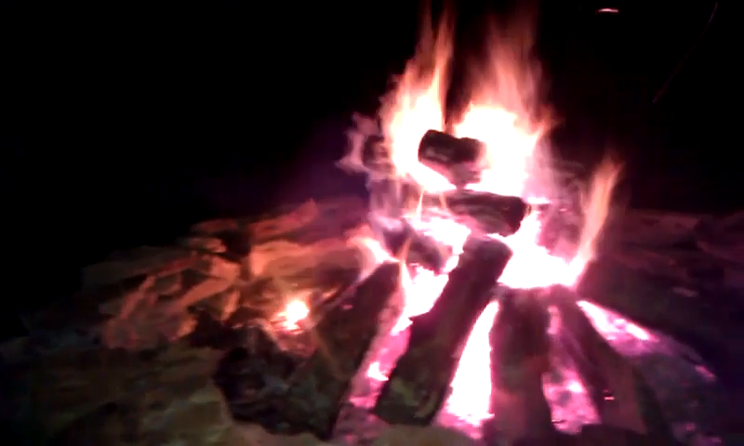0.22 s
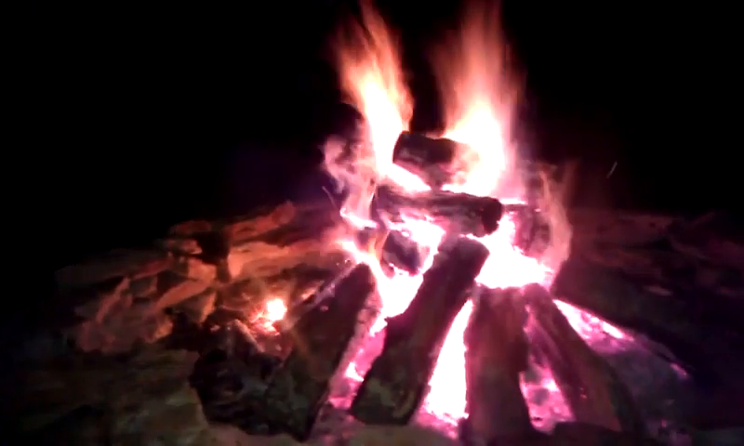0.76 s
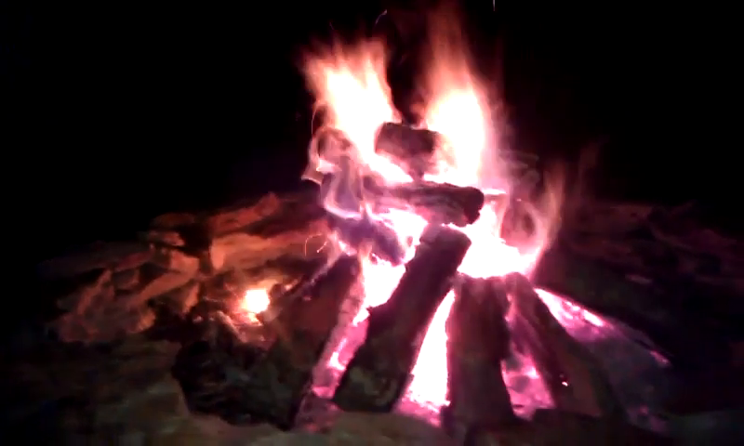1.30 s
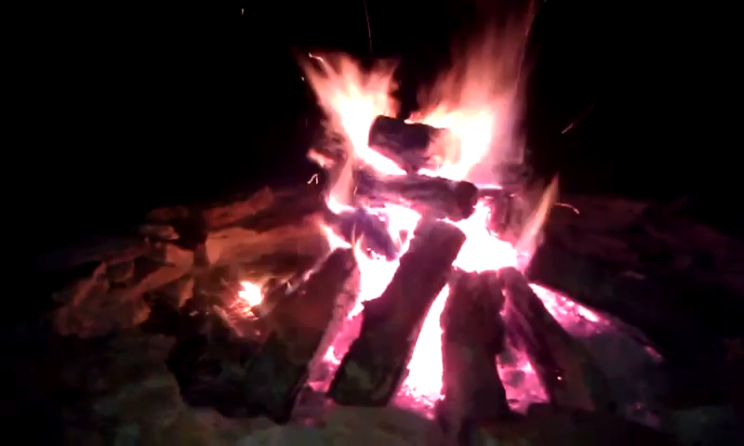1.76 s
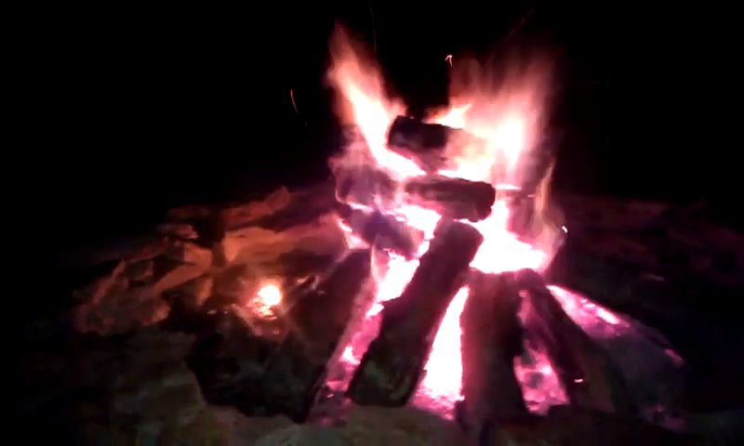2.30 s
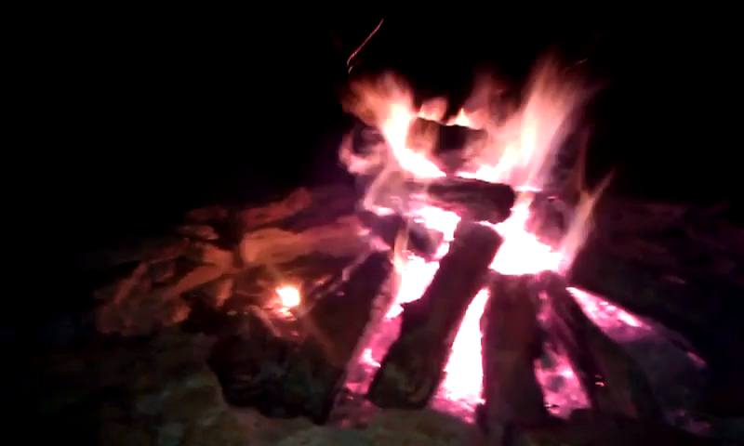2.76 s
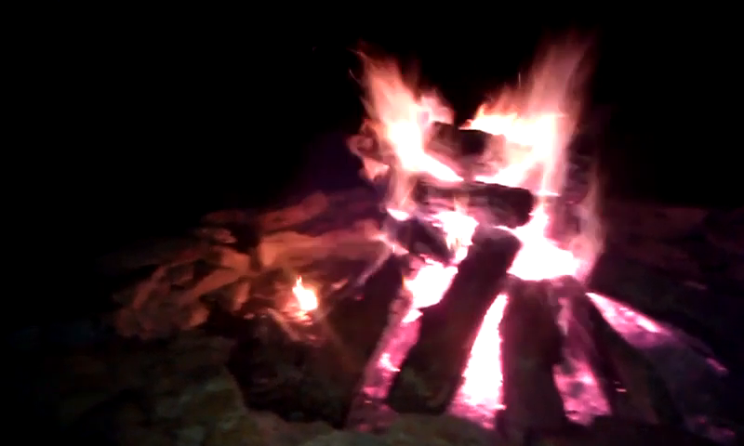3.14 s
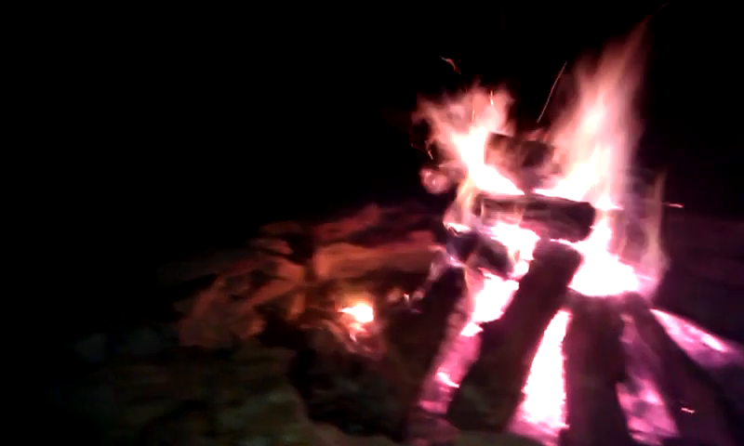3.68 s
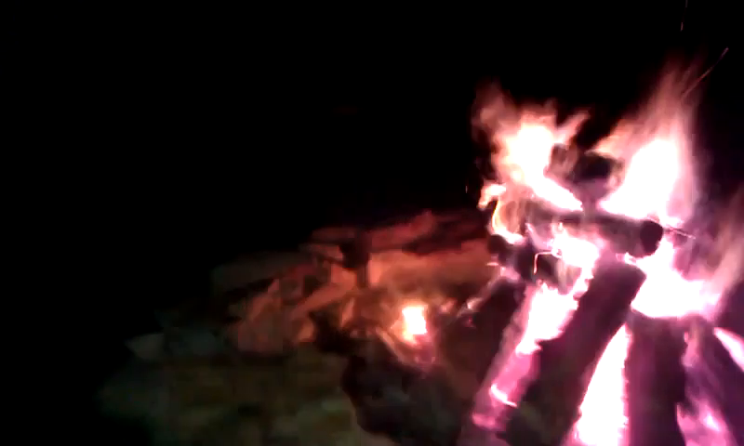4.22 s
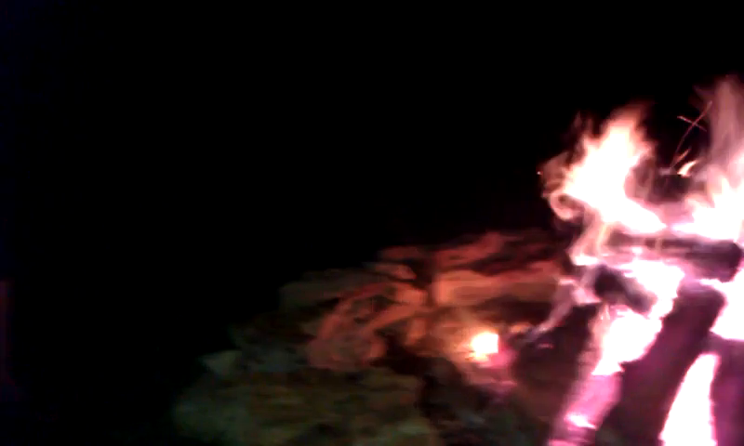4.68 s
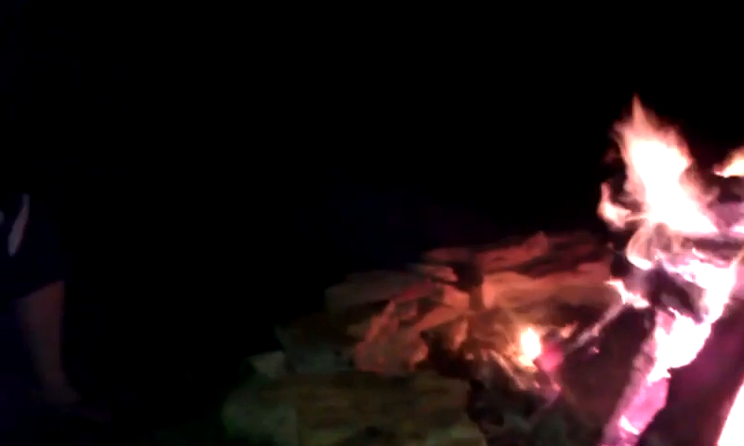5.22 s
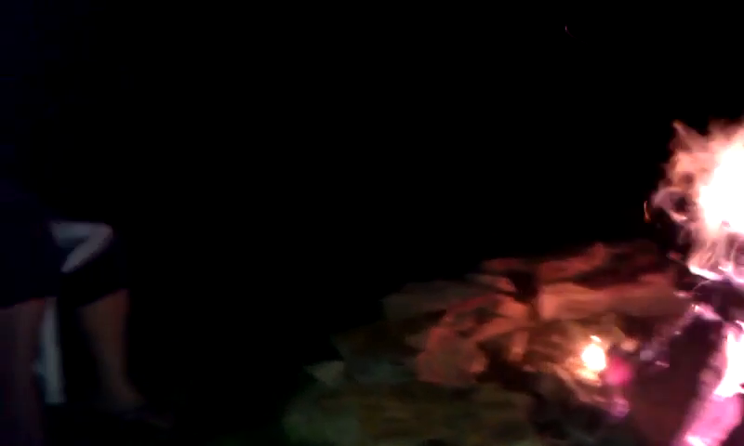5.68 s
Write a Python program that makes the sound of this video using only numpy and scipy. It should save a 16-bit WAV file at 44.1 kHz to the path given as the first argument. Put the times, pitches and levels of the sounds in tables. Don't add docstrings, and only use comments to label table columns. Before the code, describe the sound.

A wood fire burns outdoors at night, a few metres from a small, bright microphone. Soft low flame flutter lies under constant thin sizzling hiss, sprinkled with tiny ticks. Crickets hum far behind at a middle and a higher pitch; one tree cricket pulses rapidly in swelling phrases, and others come and go. High katydid zips scrape at 0.2-0.6 s, lower paired rasps at 1.8-2.2 and 4.5-4.9 s. Sharp snaps with a high ring come irregularly: strong ones near 1.0, 1.6 and 2.0 s, a much louder one at 2.4 s, with dull faint wood knocks around 1.0 and 2.1-2.3 s. Light cracks cluster at 3.0-3.5 s, then a wet rapid sputter with hiss at 3.7 s. The loudest pop strikes at 4.9 s with quick followers. Afterwards sparse crackles continue over hiss and crickets to about 6 s. Faint electric whines and grainy treble persist.

```python
import sys
import numpy as np
from scipy import signal
from scipy.fft import rfft, irfft
from scipy.io import wavfile
from scipy.ndimage import uniform_filter1d, minimum_filter1d

SR = 44100
rng = np.random.default_rng(int(sys.argv[2]) if len(sys.argv) > 2 else 0)


def level_to_linear(level):
    exponent = np.asarray(level, float) / 20
    return 10 ** exponent


def bounce(signal):
    frames = np.transpose(np.atleast_2d(signal))
    limited = np.clip(frames, -1, 1)
    pcm = np.round(limited * 32767).astype(np.int16)
    wavfile.write(sys.argv[1], SR, pcm)


N = 262350

# (frequency [Hz], density [dB per Hz])
AIR_SPECTRUM = [(900, -25.5), (1500, -22.5), (2800, -10.5), (3500, -11.5), (5000, -10.5), (6500, -7),
                (7600, -7), (8800, 0), (9600, -4), (10600, -12.5), (12500, -15.5), (15500, -18.5),
                (17200, -17.5), (19500, -38)]


def evened(x):
    return x / np.sqrt(np.mean(x ** 2) + 1e-20)


def add(mix, s, sound):
    part = mix[max(round(s * SR), 0):][:len(sound)]
    part += sound[:len(part)]


def resonate(x, hz, width):
    return signal.lfilter(*signal.iirpeak(hz, hz / width, SR), x)


def band(x, lo_hz, hi_hz):
    return signal.sosfilt(signal.butter(2, [lo_hz, hi_hz], "bandpass", fs=SR, output="sos"), x)


def wander(per_s):
    knots = rng.standard_normal(400)
    return np.interp(np.arange(N) / SR * per_s, np.arange(400), knots)


def coloured(x, points):
    f, db = np.transpose(points)
    hz = np.fft.rfftfreq(N, 1 / SR)
    gain_db = np.interp(np.log(hz + 1), np.log(f + 1), db, -90, -90)
    return evened(irfft(rfft(x) * level_to_linear(gain_db), N))


def excerpt(layer, s, end, db, soft):
    at = np.arange(round(s * SR), min(round(end * SR), N))
    piece = np.zeros(N)
    piece[at] = level_to_linear(db) * layer[at] * signal.windows.tukey(len(at), soft)
    return piece


def flames():
    # (frequency [Hz], density [dB per Hz])
    flame_spectrum = [(12, -37), (20, -6.5), (53, 0), (97, 1), (165, -2.5), (249, -2.5), (331, -6),
                      (392, -17.5), (430, -14), (464, -14), (639, -10), (931, -18), (1380, -20),
                      (1800, -18), (2340, -4), (3960, -120)]
    level_db = -47 + 0.8 * wander(14)
    return level_to_linear(level_db) * coloured(rng.standard_normal(N), flame_spectrum)


def sizzle():
    # (time [s], level [dB])
    sizzle_level = [(0.0, -47), (0.49, -47), (0.79, -48), (1.28, -46.5), (2.12, -48.5), (3.1, -47.5),
                    (3.35, -46.5), (4.24, -47), (4.77, -46), (5.37, -48), (5.8, -45.5)]
    ticks = level_to_linear(4.0 * np.minimum(rng.exponential(1, N), 4)) * rng.choice([-1, 1], N)
    ticks_per_s = 500 * level_to_linear(4.0 * wander(30))
    ticks *= rng.random(N) < ticks_per_s / SR
    hiss = rng.standard_normal(N) * level_to_linear(1.74 * wander(25))
    s, db = np.transpose(sizzle_level)
    level_db = np.interp(np.arange(N) / SR, s, db) + 2.5
    return level_to_linear(level_db) * coloured(hiss + 0.59 * evened(ticks), AIR_SPECTRUM)


def trill(length, hz, per_s):
    phase = (np.arange(length) / SR * per_s + rng.random()) % 1
    shape = np.sin(np.pi * np.clip(phase / .75, 0, 1))
    pitch = hz * (1 + .02 * (.35 - phase) + .006 * wander(40)[:length])
    direct = evened(shape * np.sin(2 * np.pi * np.cumsum(pitch) / SR))
    undergrowth = rng.standard_normal(3000) * np.exp(-np.arange(3000) / SR / .025)
    echoes = signal.oaconvolve(direct, undergrowth)[:length]
    return evened(direct + level_to_linear(-11) * evened(echoes)) * level_to_linear(1.1 * wander(18)[:length])


def phrasing(t):
    # (peak time [s], level [dB])
    phrases = [
        (0.08, -45),
        (0.74, -46),
        (1.35, -49),
        (2.15, -44.5),
        (2.83, -44.5),
        (3.0, -45.5),
        (3.66, -46),
        (4.08, -44),
        (4.36, -45.5),
        (4.88, -46),
    ]
    rest_db, rise_db_per_s, fall_db_per_s = -58, 107, 57
    s, db = np.transpose(phrases)[:, :, None]
    slopes = db - np.where(t < s, rise_db_per_s * (s - t), fall_db_per_s * (t - s))
    return np.maximum(slopes.max(axis=0), rest_db)


def crickets():
    # (centre [Hz], width [Hz], level [dB])
    chorus_bands = [(2138, 165, -50), (2420, 197, -58), (3941, 240, -53), (4127, 130, -56), (3134, 79, -70),
                    (6750, 33, -69.5)]
    # (start [s], end [s], pitch [Hz], level [dB], pulse rate [per s])
    callers = [(0, .36, 4200, -48.5, 36.6), (.32, .83, 4130, -48, 36.8), (.3, .85, 4340, -61, 36.8),
               (0, .86, 3930, -57, 36.4), (1.08, 1.43, 4370, -55, 38), (1.87, 2.24, 4200, -51, 38.2),
               (2.34, 2.82, 4110, -50, 37), (3.1, 3.3, 4350, -60, 39), (3.5, 3.9, 3930, -55, 37),
               (4.77, 4.82, 4330, -50, 38), (5.62, 5.95, 3950, -49.5, 37.5), (5.7, 5.95, 4140, -56, 37.5)]
    t = np.arange(N) / SR
    out = level_to_linear(phrasing(t) - 5.0) * trill(N, 2368, 33.3)
    for hz, width, db in chorus_bands:
        blur = resonate(resonate(rng.standard_normal(N), hz, 1.3 * width), hz, 1.3 * width)
        out += level_to_linear(db - 1.0 + 1.05 * wander(8)) * evened(blur)
    for s, end, hz, db, per_s in callers:
        length = max(round((end - s) * SR), 99)
        add(out, s, level_to_linear(db) * trill(length, hz, per_s) * signal.windows.tukey(length, .08))
    return out


def whines():
    # (frequency [Hz], level [dB])
    whine_tones = [(435, -68.5), (9801, -59.5), (11397, -58.5)]
    t, out = np.arange(N) / SR, np.zeros(N)
    for hz, db in whine_tones:
        level_db = db + 0.5 + 0.79 * wander(3.7)
        out += level_to_linear(level_db) * np.sin(2 * np.pi * hz * t + 0.24 * wander(14))
    return out


def pockets():
    # (time [s], peak [dB], ring [Hz], body re ring [dB], edge re ring [dB])
    pops = [(0.0443, -24.5, 9100, -13, -8), (0.3766, -22.5, 9000, -13, -21),
            (0.4256, -25.5, 8800, -19, -11), (0.9781, -15, 8100, -8, -5), (1.0374, -23, 9600, -23, -6),
            (1.0828, -21.5, 8800, -5, -12), (1.2894, -23.5, 8650, -20, -22), (1.465, -23.5, 9300, -25, -21),
            (1.5953, -26.5, 9130, -5, -7), (1.6402, -13.5, 9060, -11, -9), (1.7951, -24, 8320, -4, -20),
            (1.8494, -18, 9600, -12.5, -9), (1.9974, -12.5, 9400, -13, -22), (2.091, -19.5, 9600, -20, -7),
            (2.1471, -21, 8910, -15, -24), (2.2637, -22, 8500, -13, -19), (2.3922, -7, 8440, -13, -15),
            (2.9863, -22, 7850, -13, -11), (3.667, -28.5, 8950, -9, 3.5), (4.3844, -20.5, 8700, -19, -19),
            (4.4939, -19, 8640, -25, -12), (4.8744, -2.5, 8150, -9, -16), (4.9128, -16, 8840, -6, -29),
            (4.935, -18, 8800, -6, -7)]
    # (time [s], peak [dB])
    cracks = [(0.0226, -25), (0.1303, -29), (0.2158, -32), (1.0738, -24), (1.6, -26), (1.7552, -28),
              (2.3371, -29), (2.4105, -27), (2.5499, -26), (2.8439, -29), (2.9018, -26), (3.011, -22),
              (3.0266, -23.5), (3.0405, -27), (3.299, -25), (3.413, -25.5), (3.4476, -25), (3.4812, -22),
              (3.5287, -25), (3.8953, -25), (4.1474, -24), (4.2214, -24), (4.4436, -25), (4.5348, -23.5),
              (4.6414, -21), (4.7089, -24), (4.8947, -28), (5.4743, -28.5), (5.5747, -22.5), (5.912, -21)]
    # (time [s], peak [dB])
    sputter = [
        (3.6928, -22),
        (3.7002, -18),
        (3.7119, -23),
        (3.7145, -22),
        (3.7208, -24),
        (3.7236, -18),
        (3.7275, -23),
        (3.7297, -25),
        (3.7402, -20),
        (3.7436, -26),
    ]
    # ring [Hz], body and edge re ring [dB]
    crack_colour, wet_colour = [8710, -13, -14.5], [9000, -15, -23]
    faint_count = 60
    faint_s = rng.uniform(0, N / SR, faint_count)
    faint_db = -33 + 2.5 * rng.standard_normal(faint_count)
    small = np.vstack([cracks, sputter, np.c_[faint_s, faint_db]])
    wet = np.isin(small[:, 0], np.transpose(sputter)[0])[:, None]
    usual = np.where(wet, wet_colour, crack_colour)
    chance = rng.standard_normal((len(small), 3)) * [250, 4, 4]
    return np.vstack([pops, np.hstack([small, usual + chance])])


def snaps():
    # (time [s], peak [dB], pitch [Hz])
    knocks = [
        (1.02, -37.5, 656),
        (2.141, -40, 635),
        (2.306, -30.5, 653),
    ]
    out, t, rows = np.zeros(N), np.arange(1300) / SR, pockets()
    rise_s = .0002
    grit = rng.standard_normal((len(rows), 2, 1300))
    burst = np.sign(grit[:, 0]) * (t / rise_s) * np.exp(-t / rise_s)
    burst += level_to_linear(-16) * np.roll(burst, 78, axis=1)
    burst += level_to_linear(-28) * grit[:, 1] * np.exp(-t / .003) * (t > .0005)
    rings = resonate(burst, 8700, 2600)
    bodies = band(burst, 3300, 6600) + .55 * band(burst, 1900, 3300) + .2 * band(burst, 250, 1500)
    edges = band(burst, 10800, 17500)
    for (s, db, hz, body_db, edge_db), ring, body, edge in zip(rows, rings, bodies, edges):
        parts = resonate(ring, hz, 1000), body, -edge
        levels_db = db, db + body_db + 1.5, db + edge_db + 1.5
        snap = sum(level_to_linear(level) * p / abs(p).max() for p, level in zip(parts, levels_db))
        add(out, s - rise_s, snap)
    t = np.arange(2000) / SR
    for s, db, hz in knocks:
        add(out, s, level_to_linear(db) * np.sin(2 * np.pi * hz * t) * np.exp(-t / 0.0032))
    return out


def katydids():
    # (centre [Hz], width [Hz], level [dB])
    wing_bands = [(3005, 500, -4), (4470, 1200, -4), (5020, 1500, 2)]
    # (start [s], peak [s], end [s], peak level [dB])
    rasp_strokes = [
        (1.796, 1.886, 2.05, -46.5),
        (2.03, 2.122, 2.25, -45),
        (4.5, 4.573, 4.68, -46),
        (4.715, 4.803, 4.89, -44),
    ]
    # (start [s], end [s], level [dB])
    zip_strokes = [
        (0.235, 0.263, -43),
        (0.31, 0.383, -43.5),
        (0.418, 0.514, -42),
        (0.525, 0.633, -41),
    ]
    out, scrape = np.zeros(N), rng.standard_normal(N) * level_to_linear(1.5 * wander(60))
    wing = [level_to_linear(db) * evened(resonate(resonate(scrape, hz, w), hz, w)) for hz, w, db in wing_bands]
    low = evened(sum(wing))
    high = evened(resonate(resonate(scrape, 8000, 1200), 8700, 1500))
    ends_db = -8.5
    for s, top, end, db in rasp_strokes:
        at = np.arange(round(s * SR), round(end * SR))
        swell_db = np.interp(at / SR, [s, top, end], [ends_db, 0, ends_db])
        out[at] += level_to_linear(db + swell_db + 3.5) * low[at] * signal.windows.tukey(len(at), .2)
    for s, end, db in zip_strokes:
        out += excerpt(high, s, end, db, 0.45)
    return out


def steam():
    # (start [s], end [s], level [dB])
    jets = [
        (1.607, 1.6105, -37),
        (1.072, 1.0794, -37),
        (3.68, 3.782, -42.5),
        (3.698, 3.702, -33),
        (3.721, 3.731, -34),
        (3.738, 3.744, -33),
        (3.665, 3.669, -36),
        (5.368, 5.38, -38.5),
        (3.022, 3.056, -44),
        (4.863, 4.99, -49),
    ]
    # (start [s], end [s], start pitch [Hz], end pitch [Hz], level [dB])
    vents = [
        (2.44, 2.5, 13700, 13600, -63),
        (3.333, 4.206, 13900, 14000, -64),
        (4.44, 4.6, 13900, 13580, -56),
        (4.68, 4.9, 13800, 13600, -60),
        (5.1, 5.25, 14400, 14300, -64),
    ]
    out, t = np.zeros(N), np.arange(N) / SR
    gusts = np.repeat(rng.standard_normal(N // 30 + 1), 30)[:N]
    spit = coloured(rng.standard_normal(N) * level_to_linear(3.5 * gusts), AIR_SPECTRUM)
    for s, end, db in jets:
        out += excerpt(spit, s, end, db, 0.19)
    for s, end, from_hz, to_hz, db in vents:
        pitch = np.interp(t, [s, end], [from_hz, to_hz]) + 110 * wander(80)
        whistle = level_to_linear(2.9 * wander(50)) * np.sin(2 * np.pi * np.cumsum(pitch) / SR)
        out += excerpt(whistle, s, end, db + 1, .3)
    return out


def scene():
    fire = flames() + sizzle() + snaps() + steam()
    insects = crickets() + katydids()
    return (fire + insects + whines())[None]


def stored(x):
    # (frequency [Hz], rms over step [ratio])
    step_fineness = [(200, 24), (1200, 18), (1700, 9), (2200, 4), (2800, .48), (3500, .5), (4000, 1.4),
                     (4700, .33), (5600, .4), (6700, .42), (7800, 1.8), (8600, 3), (9500, 1.5),
                     (10500, .32), (12500, .36), (16000, .42)]
    size, lead, uneven_db = 1024, 2048 - 635, 6
    n, k = np.arange(2 * size) + .5 + size / 2, np.arange(size) + .5
    window = signal.windows.kaiser_bessel_derived(2 * size, 4 * np.pi)
    basis = np.cos(np.pi / size * np.outer(n, k)) * window[:, None]
    halves = np.pad(x, (lead, 3 * size - (lead + N) % size)).reshape(-1, size)
    bins = np.hstack([halves[:-1], halves[1:]]) @ basis
    power = minimum_filter1d(uniform_filter1d(bins ** 2, size=36), size=3, axis=0)
    nearby = np.sqrt(uniform_filter1d(power, size=3, axis=0) + 1e-14)
    wobble = uniform_filter1d(rng.standard_normal((len(bins), 64)), size=3, axis=0)
    wobble = np.repeat(wobble, 16, axis=1)
    wobble += .3 * uniform_filter1d(rng.standard_normal(len(bins)), size=2)[:, None]
    fineness = np.interp(k * SR / 2 / size, *np.transpose(step_fineness))
    step = nearby * level_to_linear(uneven_db * wobble) / fineness
    rounded = np.sign(bins) * np.floor(abs(bins / step) ** .75 + .4) ** (4 / 3) * step
    frames = rounded @ basis.T * 2 / size
    opening = np.pad(frames[:, :size], ((0, 1), (0, 0)))
    closing = np.pad(frames[:, size:], ((1, 0), (0, 0)))
    return (opening + closing).ravel()[lead:lead + N]


def low_pass(x):
    return signal.sosfilt(signal.butter(12, 19390, fs=SR, output="sos"), x)


def record(dry):
    overload = .8 * np.tanh(dry[0] / .8)
    kept = stored(overload)[None]
    high_pass = signal.firwin(511, 17200, pass_zero=False, fs=SR)[None]
    limited = kept - .85 * signal.oaconvolve(kept, high_pass, "same")
    return low_pass(limited)


dry = scene()
out = record(dry)
bounce(out)
```